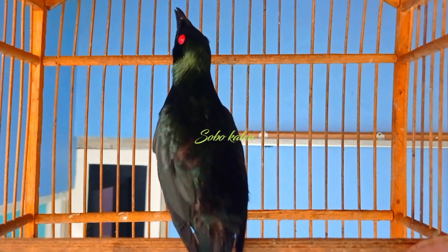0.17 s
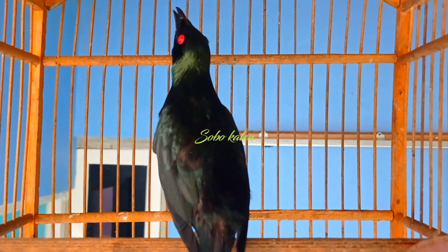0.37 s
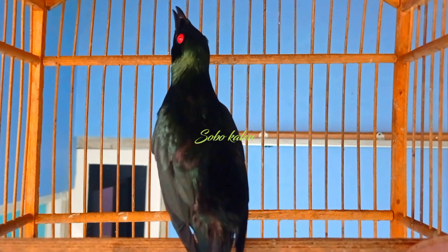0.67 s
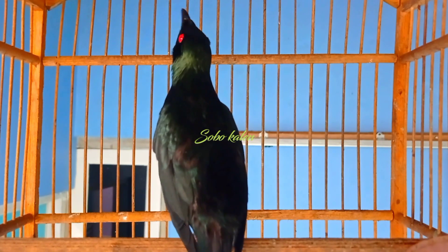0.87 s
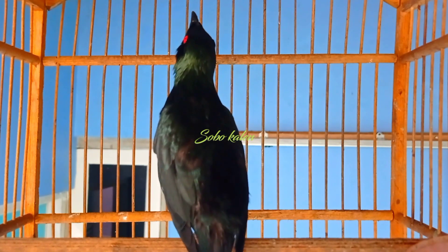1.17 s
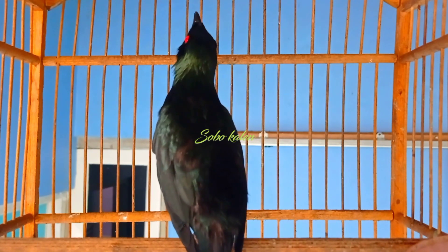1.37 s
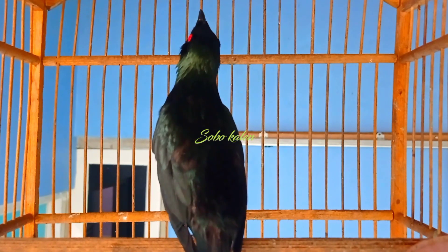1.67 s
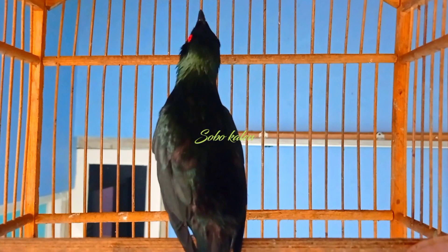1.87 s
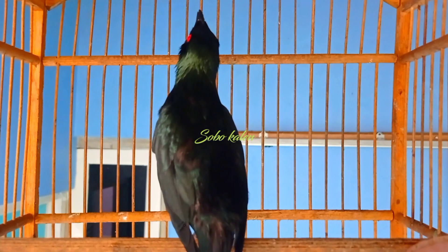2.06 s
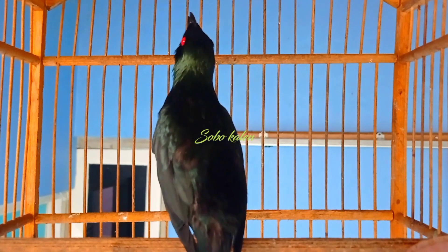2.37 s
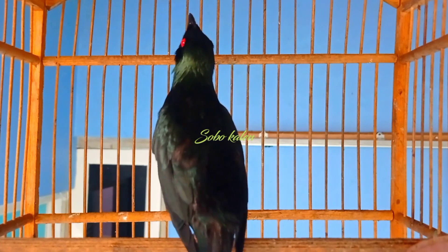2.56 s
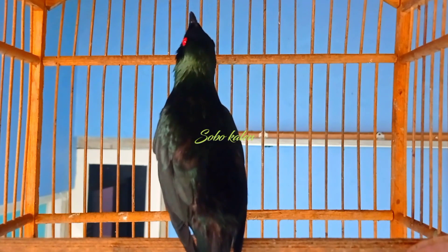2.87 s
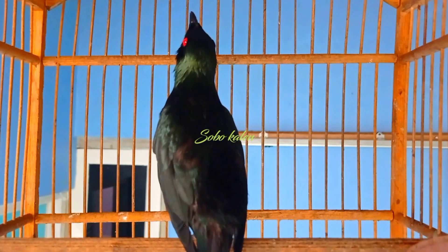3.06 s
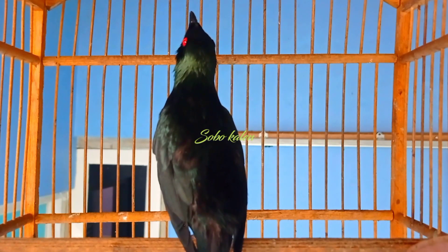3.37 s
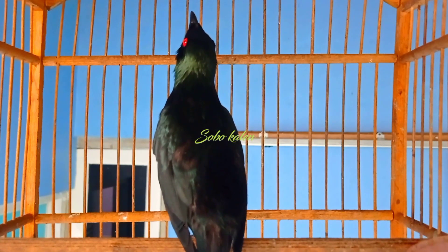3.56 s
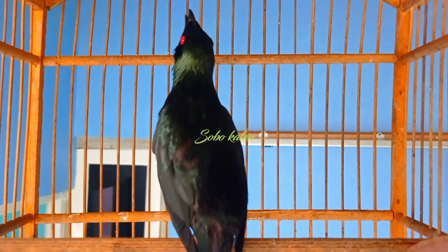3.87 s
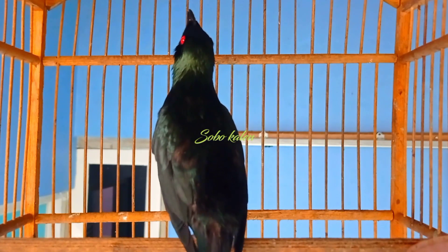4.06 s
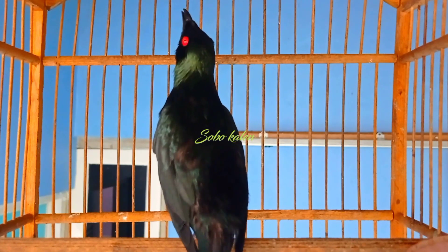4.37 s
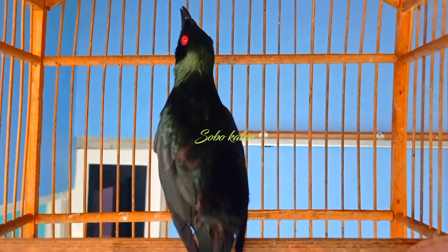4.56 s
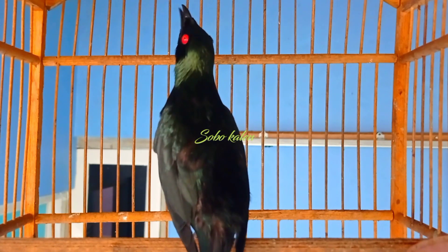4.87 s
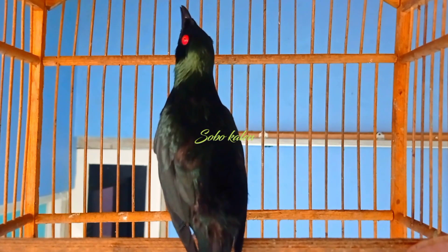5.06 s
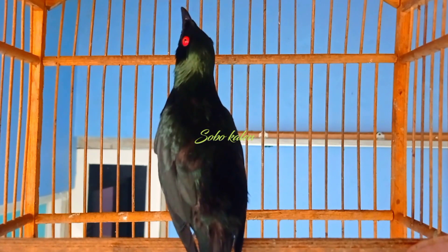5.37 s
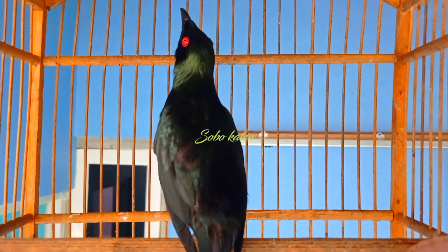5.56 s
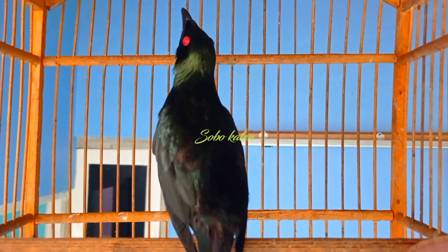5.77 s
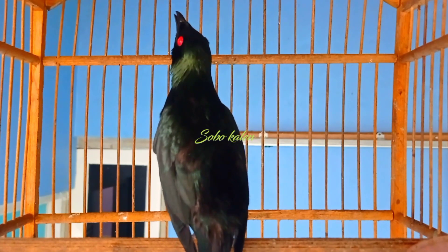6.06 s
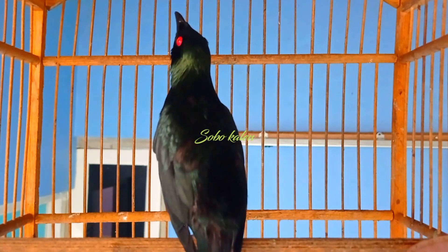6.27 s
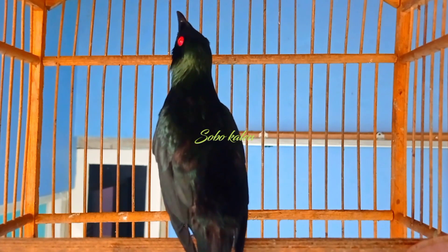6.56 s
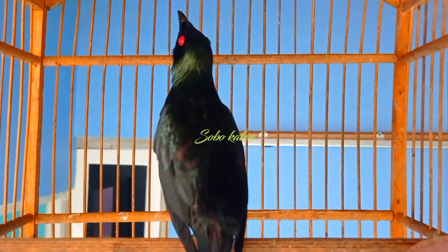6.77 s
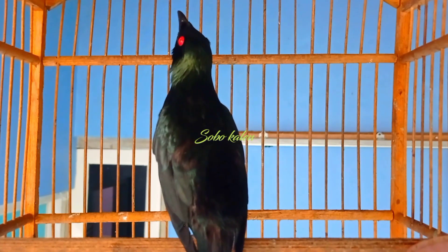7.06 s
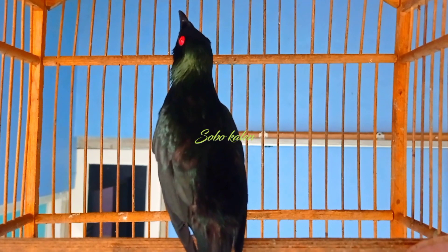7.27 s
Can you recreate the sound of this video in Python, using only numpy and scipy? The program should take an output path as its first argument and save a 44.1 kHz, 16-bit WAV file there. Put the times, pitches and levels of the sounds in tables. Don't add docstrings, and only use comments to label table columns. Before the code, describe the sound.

Close, bright starling song shifts from rapid buzzes and upward slurs to loud whistles, bell-like pulses, soft low notes and reedy toots, with distant birds behind.

```python
import sys
import numpy as np
from scipy import signal
from scipy.fft import rfft, irfft, next_fast_len
from scipy.io import wavfile
from scipy.ndimage import uniform_filter1d, map_coordinates

SR = 44100
rng = np.random.default_rng(int(sys.argv[2]) if len(sys.argv) > 2 else 0)


def linear_from_db(decibels):
    return 10 ** (np.asarray(decibels, float) / 20)


def generate_wav(signal):
    frames = np.transpose(np.atleast_2d(signal))
    scaled = np.clip(frames, -1, 1) * 32767
    pcm = np.round(scaled).astype(np.int16)
    wavfile.write(sys.argv[1], SR, pcm)


N = 327663
T = np.arange(N) / SR

# frequency in Hz, density in dB per Hz.
TRAFFIC = [(12, -50), (20, -36.5), (48, -26), (93, -2), (138, -4.5), (178, -11.5), (216, -12), (416, -25),
           (660, -22.5), (700, -76.5), (910, -28.5), (1540, -120)]
# time in seconds, level in dB.
PASSING = [(0, -49), (.9, -46.5), (1.2, -47), (1.43, -45), (2.1, -46.5), (3.0, -52), (3.6, -48), (3.9, -48),
           (4.12, -49), (4.37, -42.5), (4.6, -48.5), (5.07, -44), (5.6, -49), (6.6, -47), (6.81, -45.5),
           (7.0, -44.5), (7.43, -48)]
# start in seconds, end in seconds, pitch in Hz, level in dB.
HUMS = [
    (0, 21, 82, -57),
    (0, 8.5, 104, -53),
    (0, 8.02, 137, -57.5),
    (.05, 0.59, 324, -53),
    (.8, 1.48, 345, -52.5),
    (.9, 1.5, 694, -52),
    (.05, 0.28, 536, -45.5),
]
# frequency in Hz, density in dB per Hz.
CHATTER = [(350, -15), (600, -21), (900, -5.5), (1300, -2), (1900, -6), (2400, -16), (3200, -82.5)]
# time in seconds, level in dB.
FLOCK = [(0, -40), (1.2, -46), (2.1, -48), (2.9, -55.5), (3.2, -61), (3.9, -53), (4.15, -45.5), (4.85, -49),
         (5.3, -47.5), (6.6, -58), (7.0, -44.5), (7.43, -53)]
# frequency in Hz, density in dB per Hz.
HISS = [(900, -76.5), (1500, -7.5), (2200, -11), (4000, -6), (6500, -8.5), (8000, -21.5), (10000, -17),
        (11500, -80.5)]
# centre in Hz, width in Hz, level in dB.
RIDGES = [(2873, 18, -5), (3986, 18, -4.5), (4900, 120, -13), (6230, 190, -12), (6100, 380, -28),
          (7140, 19, -26), (7390, 120, 0), (8570, 100, -6.5), (9500, 81, -20.5)]
# frequency in Hz, density in dB per Hz.
FIZZ = [(4710, -30), (8000, -10.5), (8650, -6.5), (9000, -15.5), (9750, -10), (11200, -20), (13400, -24.5),
        (14900, -15.5), (15900, -15)]
# crest in seconds, level in dB, swell in seconds, lower band against the upper in dB.
BUZZES = [
    (0.01, -21, 0.045, -5.5),
    (0.326, -23.5, 0.074, -3.5),
    (0.646, -15, 0.084, -10),
    (0.986, -26, 0.13, -3.5),
    (4.072, -22.5, 0.1, -4.5),
    (4.465, -22, 0.1, -6.5),
    (4.774, -19, 0.1, -6.5),
    (5.101, -18, 0.11, -8),
]
# centre in Hz, width in Hz, level in dB.
OPEN_THROAT = [(6500, 400, 8.5), (7350, 910, -4.5), (5800, 280, -7), (10200, 1600, -37)]
# centre in Hz, width in Hz, level in dB.
CLOSING_THROAT = [(5580, 450, -0.5), (6560, 380, -3.5), (7320, 98, 0.5), (10600, 620, -15.5)]
# centre in Hz, width in Hz, level in dB.
LOWER_THROAT = [(1500, 570, -4.5), (2550, 720, 0.5), (4000, 1580, 4), (4700, 710, 4.5)]
# start in seconds, peak in dB, pitch in Hz, high overtones in dB.
CLOSERS = [
    (0.0146, -28.5, 1887, -15),
    (0.339, -27.5, 1942, -6),
    (0.661, -22, 1902, -1),
    (1.0055, -29.5, 1872, -5),
    (4.4742, -28.5, 1900, -14),
    (4.78, -24.5, 1930, -1.5),
    (5.107, -28, 1907, 4.5),
]
CLOSER_TONE = [10.5, -7.5, -5, -2.5, -21]
# start in seconds, top pitch in Hz, low start in dB, share of the usual rise time.
SLURS = [(0.053, 3388, -6, .95), (0.267, 3390, -3.5, 0.97), (0.477, 3393, -11, 1), (.695, 3428, -5, 1),
         (0.912, 3463, -11, 0.92), (1.129, 3427, -14, 1), (1.35, 3420, -14.5, .9), (1.567, 3470, -27, .9),
         (1.781, 3473, -15.5, 0.98), (1.997, 3400, -6.5, 0.9)]
# seconds after start, share of top pitch, level in dB, 1 for the low start.
SLUR_SHAPE = [(0, .6, -6, 1), (.012, .72, -.5, 1), (.03, .895, -4, 1), (.033, .915, -2, 0),
              (.055, .97, -2, 0), (.08, 1.0, 0, 0), (.105, 1.01, -4, 0), (.125, .99, -25, 0)]
# start in seconds, peak in dB, pitch in Hz.
PIPS = [(0.111, -28.5, 870), (1.2, -34, 1030), (1.278, -31, 1064), (1.33, -34, 1175), (1.814, -48, 1270),
        (2.196, -28.5, 1033), (2.507, -41, 1125), (2.599, -29.5, 1037), (2.79, -25.5, 1440),
        (3.109, -35, 774), (3.268, -32.5, 1270), (3.776, -34, 920), (4.11, -27, 950), (5.788, -23.5, 1410),
        (6.062, -38.5, 1080)]
# start in seconds, peak in dB,
# pitch in Hz.
COOS = [(0.561, -35, 804), (1.528, -31, 907), (1.76, -48, 1325), (2.331, -39, 914), (2.742, -31.5, 965),
        (3.289, -31.5, 911), (3.444, -37, 1310), (3.476, -27, 938), (.84, -34.5, 928), (.43, -37.5, 900),
        (4.412, -45, 1000), (4.52, -28.5, 930), (4.574, -36, 926), (4.666, -32, 918), (4.918, -38, 915),
        (5.224, -44.5, 1042), (5.361, -36, 754), (5.401, -40, 988), (6.298, -45.5, 914), (6.764, -29, 760),
        (7.081, -35, 939)]
# start in seconds, peak in dB, pitch in Hz.
TOOTS = [
    (6.829, -26, 1246),
    (6.961, -40.5, 1380),
    (6.976, -28, 1212),
    (7.139, -26.5, 1239),
    (7.269, -28.5, 1172),
    (7.401, -26, 1177),
]
# hold in seconds, octave in dB.
PIP_VOICE = (0.0077, -20)
COO_VOICE = (0.0196, -26)
TOOT_VOICE = (0.0167, 0.41)
# start in seconds, peak in dB, pitch in Hz, hold in seconds.
CHIPS = [
    (0.17, -21, 1710, .013),
    (0.4755, -20, 1667, 0.014),
    (0.812, -21.5, 1706, .02),
    (3.913, -25, 1874, 0.01),
    (4.288, -22.5, 1741, 0.015),
    (4.5955, -20, 1725, 0.019),
    (4.935, -22, 1733, 0.019),
]
CHIP_TONE = [-2.5, -4.5, 4, -9, -13]
# start in seconds, peak in dB, pitch in Hz, hold in seconds.
PINGS = [(0.383, -40, 2093, 0.034), (1.829, -40.5, 2038, 0.095), (1.856, -31, 2130, 0.0058),
         (4.194, -44.5, 2240, 0.016), (4.56, -47, 2250, 0.058), (4.887, -43.5, 2260, 0.052),
         (5.226, -46, 2270, 0.11), (5.637, -59, 1915, 0.093), (5.647, -43, 2520, 0.15),
         (5.896, -32.5, 2310, 0.0043)]
# start in seconds, peak in dB, pitch in Hz, hold in seconds.
SQUEAKS = [(0.95, -36, 7350, 0.042), (0.993, -28.5, 5460, 0.047), (1.001, -25.5, 7350, 0.011),
           (2.303, -22, 5834, 0.013), (4.044, -38, 3680, 0.015), (4.064, -35, 3930, 0.02),
           (4.091, -29.5, 3550, 0.025), (4.087, -22.5, 7070, 0.021), (4.086, -38, 5350, .015),
           (4.777, -36, 7740, 0.024), (5.11, -23.5, 7180, 0.015)]
# start in seconds, level in dB, centre in Hz, length in seconds.
PUFFS = [(0.688, -5, 5000, 0.0028), (1.348, -23.5, 2300, 0.014), (1.35, -26.5, 7240, 0.022),
         (1.786, -31, 2020, 0.094), (2.544, -25.5, 2420, 0.0088), (2.736, -33.5, 3060, 0.03),
         (2.787, -18.5, 3780, 0.0078), (3.114, -37, 1250, 0.027), (3.77, -39, 2800, 0.017),
         (3.589, -44, 1560, 0.045), (5.552, -28, 7550, 0.012), (5.793, -25, 2430, 0.016),
         (5.813, -33, 6100, .02), (5.949, -29, 4700, 0.025), (6.291, -34.5, 1230, 0.0095),
         (6.575, -35.5, 1970, 0.021), (6.791, -22.5, 4620, 0.0057), (6.869, -20, 5880, 0.0091),
         (7.009, -27.5, 4000, 0.017)]
# time in seconds, pitch in Hz, level in dB.
RISING = [(1.485, 1652, -41), (1.525, 2230, -21), (1.536, 2397, -3), (1.544, 2594, -18), (1.559, 2855, -15),
          (1.576, 2988, -6), (1.596, 3176, -11), (1.619, 3224, -23.5), (1.65, 3390, -46)]
# time in seconds, pitch in Hz, level in dB.
LEVEL = [(2.299, 5910, -21), (2.309, 5685, -14), (2.325, 5478, -3), (2.366, 5510, 0), (2.43, 5250, -7),
         (2.6, 5210, -10), (2.62, 5100, -28)]
# time in seconds, pitch in Hz, level in dB.
FALLING = [(6.042, 6760, -17.5), (6.065, 6720, -15.5), (6.07, 6500, -4), (6.105, 6573, 2),
           (6.124, 6470, -7.5), (6.249, 4917, -12.5), (6.299, 4510, -18), (6.455, 3012, -19.5),
           (6.499, 2860, -44)]
WHISTLE_TONE = [-4.5, -16.5, -16]
WHISTLE_FLUTTER = [(.002, 0), (.002, 22), (.001, 12)]
# pitch in Hz, octave in dB.
OCTAVE = [(1700, -4), (2500, -25.5), (3050, -13.5), (3700, -1.5), (4500, -24), (5200, -17.5), (5600, -29),
          (6500, -28)]
# start in seconds, peak in dB, pitch in Hz, hold in seconds,
# octave in dB.
BELLS = [
    (2.798, -14, 2244, 0.011, -14),
    (2.82, -17, 2237, 0.023, -19),
    (2.86, -17, 2246, 0.013, -34),
    (2.886, -19, 3068, .017, -13),
    (2.927, -21.5, 3042, 0.019, -28),
    (2.987, -31, 3068, 0.031, -34),
]
# frequency in Hz, 60 dB decay time in seconds.
YARD = [(700, 0.43), (2000, 0.5), (3500, 0.5), (6000, 0.37), (12000, 0.31)]
# delay in seconds, spread in seconds, gain over the tail.
FAR_WALL = (0.061, 0.014, 0.52)
# frequency in Hz, level in dB.
WAY = [(300, -16), (1000, 0.3), (3500, -0.97), (6500, 0.97), (7600, -7), (8300, -7.5), (10000, -12.5),
       (11500, -13.5), (12500, -27), (14000, -22.5)]


def unit(x):
    return x / np.sqrt(np.mean(x ** 2) + 1e-20)


def along(points, hz):
    f, v = np.transpose(points)
    return np.interp(np.log(hz + 1), np.log(f + 1), v)


def wobble(rate):
    return map_coordinates(rng.standard_normal(int(N * rate / SR) + 4), [T * rate])


def filtered(x, response):
    m = next_fast_len(len(x) + 8192)
    return irfft(rfft(x, m) * response(np.fft.rfftfreq(m, 1 / SR)), m)[:len(x)]


def bands(modes):
    def response(f):
        total = 0
        for k, (centre, width, db) in enumerate(modes):
            damping = 1j * f * width
            total = total + (-1) ** k * linear_from_db(db) * damping / (centre ** 2 - f * f + damping)
        return total
    return response


def patchy(spectrum, depth_db):
    z = signal.stft(rng.standard_normal(N), nperseg=512)[2]
    field = uniform_filter1d(rng.standard_normal(z.shape), 8, 0)
    field = uniform_filter1d(field, 16, 1)
    noise = signal.istft(z * linear_from_db(depth_db * unit(field)), nperseg=512)[1][:N]
    return unit(filtered(noise, lambda f: linear_from_db(along(spectrum, f))))


def traffic(level_db):
    rumble = patchy(TRAFFIC, depth_db=3.2) * linear_from_db(1.5 * wobble(5))
    hums = np.zeros(N)
    for start, end, hz, db in HUMS:
        ends = np.clip(np.minimum(T - start, end - T) / .06, 0, 1)
        swell = ends * linear_from_db(db + 47 + 3 * wobble(3)) * wobble(hz / 12)
        hums += swell * np.sin(2 * np.pi * np.cumsum(hz * (1 + 0.0202 * wobble(4.6))) / SR)
    low_cut = lambda f: 1 / (1 + (45 / (f + 1)) ** 4)
    return linear_from_db(level_db) * filtered(rumble + hums, low_cut)


def outdoor_hiss(flock_db):
    def ridges(f):
        return 1 + sum(linear_from_db(db + 14) / (1 + (2 * (f - hz) / (width + 120)) ** 2) for hz, width, db in RIDGES)
    hiss = unit(filtered(patchy(HISS, depth_db=3.0), ridges))
    return linear_from_db(-41.5 + 0.24 * (flock_db - flock_db.mean())) * hiss


def background():
    traffic_db = np.interp(T, *np.transpose(PASSING))
    flock_db = np.interp(T, *np.transpose(FLOCK))
    chatter = linear_from_db(flock_db + 3) * patchy(CHATTER, depth_db=8.0)
    return traffic(traffic_db) + outdoor_hiss(flock_db) + chatter


def buzzes(rate=210, scatter=0.27, sink=0.0069, lag=0.0044):
    cycle = np.cumsum(rate * (1 + scatter * wobble(90))) / SR % 1
    source = (np.exp(-cycle / .35) + .3) * rng.standard_normal(N) * linear_from_db(2.6 * wobble(45))

    def upper(modes):
        return unit(filtered(source, lambda f: bands(modes)(f) * f * f / (f + 4500 / 1j) ** 2))

    opened, closing, lower = upper(OPEN_THROAT), upper(CLOSING_THROAT), unit(filtered(source, bands(LOWER_THROAT)))
    out = np.zeros(N)
    for s, db, swell, low_db in BUZZES:
        def shape(t):
            side = np.where(t < 0, swell, 0.52 * swell)
            return linear_from_db(db - 24.0 * np.abs(t / side) ** 1.95)
        turn = np.pi / 2 * np.clip((T - s) / sink + 1.7, 0, 1)
        out += shape(T - s) * (np.cos(turn) * opened + np.sin(turn) * closing)
        out += linear_from_db(low_db) * shape(T - s - lag) * lower
    return out


def sing(out, rows, tone_db, edge=0.0039, flutter=0.0024, tiring=0, throat=((1, 0),)):
    s, hz, db = np.transpose(rows)
    span = slice(int(s[0] * SR), int(s[-1] * SR))
    t = T[span]
    shake = uniform_filter1d(rng.standard_normal(len(t)), 130) * np.sqrt(130)
    pitch = np.exp(np.interp(t, s, np.log(hz)))
    unsteady = 1 + flutter * (1 + tiring * (t - s[0])) * shake
    turn = 2 * np.pi * np.cumsum(pitch * unsteady) / SR
    over = sum(linear_from_db(g) * np.cos((k + 2) * turn) for k, g in enumerate(tone_db))
    wave = np.cos(turn) + over * linear_from_db(along(throat, pitch))
    ends = np.clip(np.minimum(t - s[0], s[-1] - t) / edge, 0, 1)
    out[span] += np.sqrt(2) * linear_from_db(np.interp(t, s, db)) * ends * wave


def breaks(table, tone_db, share, lead, arch, fall, crack_db, fade_db, flutter, snap_db, lift_db):
    out, t = np.zeros(N), T[:SR // 50]
    for s, db, hz, hold, high_db in table:
        db, end = db - 4.0, s + hold - .003
        rows = [(s - lead, (1 - 4 * lead) * hz, db - 6),
                (s + .002, hz, db - 3),
                (end, arch * hz, db),
                (end + fall * .4, (arch - .09) * hz, db + crack_db + lift_db),
                (end + fall, share * hz, db - fade_db + lift_db)]
        throat = [(share * hz, -lift_db - max(lift_db, 0)), ((arch - .1) * hz, -lift_db), ((arch - .06) * hz, 0)]
        tone = np.add(tone_db, high_db * (np.arange(len(tone_db)) > 0))
        sing(out, rows, tone, edge=.002, flutter=flutter, throat=throat)
        snap = linear_from_db(db + snap_db - 60 * t / 0.083) * rng.standard_normal(len(t))
        out[round((end + fall * .6) * SR):][:len(t)] += snap
    return out


def closers():
    rows = [(s, db, hz, .031, high_db) for s, db, hz, high_db in CLOSERS]
    return breaks(rows, CLOSER_TONE, share=0.817, lead=.008, arch=1.06, fall=0.0096, crack_db=6, fade_db=-0.5,
                  flutter=0.016, snap_db=-15, lift_db=-12)


def slurs():
    out = np.zeros(N)
    for s, top_hz, low_db, pace in SLURS:
        rows = []
        for after, share, level, low in SLUR_SHAPE:
            when = s + after * (pace if low else 1)
            rows.append((when, share * top_hz, -19.5 + level + low * low_db))
        sing(out, rows, [-35], flutter=0.0072)
    return out


def notes(table, trim_db, high_db, flutter, edge=0.0021):
    out = np.zeros(N)
    for s, db, hz, hold, octave_db in table:
        rows = [(s - .003, .99 * hz, db + trim_db), (s + hold, 1.005 * hz, db + trim_db - 3)]
        tone = [octave_db, octave_db + high_db, octave_db + high_db - 1]
        sing(out, rows, tone, edge=edge, flutter=flutter)
    return out


def low_notes():
    kinds = [(PIPS, PIP_VOICE), (COOS, COO_VOICE), (TOOTS, TOOT_VOICE)]
    rows = [tuple(row) + tuple(voice) for table, voice in kinds for row in table]
    return notes(rows, trim_db=-6.0, high_db=-18.5, flutter=.011)


def chips():
    return breaks([tuple(row) + (0,) for row in CHIPS], CHIP_TONE, share=0.564, lead=.003, arch=0.98, fall=.009,
                  crack_db=-0.9, fade_db=15.5, flutter=.01, snap_db=-1, lift_db=4.5)


def pings_and_squeaks():
    pings = notes([tuple(row) + (-15,) for row in PINGS], trim_db=0.0, high_db=-2, flutter=.017)
    return pings + notes([tuple(row) + (-41,) for row in SQUEAKS], trim_db=0.0, high_db=-2, flutter=.007)


def puffs():
    out, t = np.zeros(N), T[:SR // 5]
    for s, db, hz, length in PUFFS:
        width_hz = 420 + 0.53 * hz
        air = unit(filtered(rng.standard_normal(len(t)), lambda f: np.exp(-2 * ((f - hz) / width_hz) ** 2)))
        out[round(s * SR):][:len(t)] += linear_from_db(db) * air * np.exp(-t / length) * (1 - np.exp(-t / 0.003))
    return out


def whistles():
    out = np.zeros(N)
    for rows, third_db, (flutter, tiring) in zip([RISING, LEVEL, FALLING], WHISTLE_TONE, WHISTLE_FLUTTER):
        sing(out, rows, [0, third_db], edge=.004, flutter=flutter, tiring=tiring, throat=OCTAVE)
    return out


def bells():
    return notes(BELLS, trim_db=-2.0, high_db=-1.5, flutter=0.0036, edge=0.0037)


def yard(x, early_db=-3, piece=.3):
    out, size = np.zeros(N + 2 * SR), int(piece * SR)
    padded = np.pad(x, (size, 2 * size))
    delay, spread, gain = FAR_WALL
    for start in range(0, N + size, size):
        hz, t, z = signal.stft(rng.standard_normal(SR * 3 // 4), SR, nperseg=256)
        tail = signal.istft(z * linear_from_db(-60 * t / along(YARD, hz)[:, None]), SR, nperseg=256)[1]
        tail *= np.clip(np.arange(len(tail)) / SR / 0.0042 - .3, 0, 1) / np.linalg.norm(tail)
        tail *= 0.92 + gain * np.exp(-((T[:len(tail)] - delay) / spread) ** 2)
        echoes = (rng.uniform(.002, .018, size=24) * SR).astype(int)
        tail[echoes] += linear_from_db(early_db) * rng.normal(0, 0.21, size=24)
        wet = signal.fftconvolve(padded[start:start + 2 * size] * np.hanning(2 * size), tail)
        out[start:start + len(wet)] += wet[:len(out) - start]
    return out[size:size + N]


def comb(depth):
    return lambda f: 1 + depth * np.exp(-2j * np.pi * f / 1003)


def ducking(song):
    loud_db = 10 * np.log10(np.abs(uniform_filter1d(song ** 2, int(.08 * SR))) + 1e-9)
    return linear_from_db(-.55 * np.maximum(loud_db + 20, 0))


def scene():
    # layer, straight level in dB, yard level in dB
    mix = [(buzzes(), -0.5, -3), (closers(), -1.5, -3.5), (slurs(), -2.0, -0.35),
           (low_notes(), 2.36, 1.8), (chips(), 4.0, 0.0), (pings_and_squeaks(), 3.4, 2.6),
           (puffs(), -6.5, -3.0), (whistles(), -1.0, -4.5), (bells(), 3.0, -3.0)]
    straight = sum(linear_from_db(db) * layer for layer, db, _ in mix)
    song = straight + yard(sum(linear_from_db(db) * layer for layer, _, db in mix))
    heard = filtered(song, lambda f: linear_from_db(along(WAY, f)) * comb(depth=.3)(f))
    fizz = linear_from_db(-52.5) * patchy(FIZZ, depth_db=0.5)
    return (heard + ducking(heard) * background() + fizz)[None]


def low_pass(x):
    return signal.sosfilt(signal.butter(12, 16190, fs=SR, output="sos"), x)


def record(dry):
    clipped = np.clip(dry[0], -.72, .72)
    kept = filtered(clipped, lambda f: np.clip((15620 - f) / 250, 0, 1))
    return low_pass(kept[None])


dry = scene()
out = record(dry)
generate_wav(out)
```